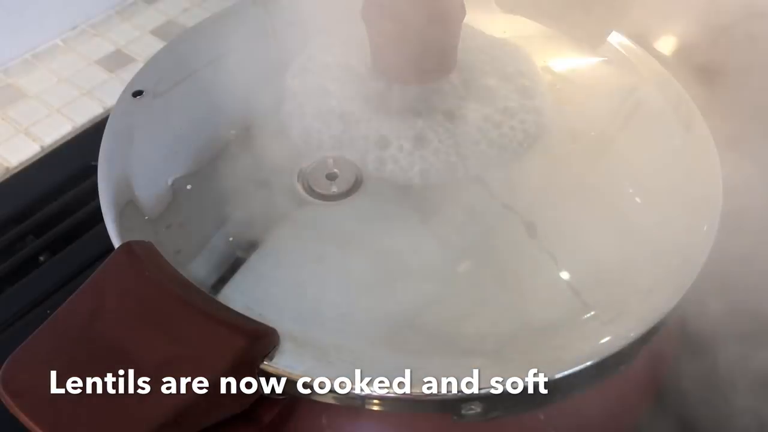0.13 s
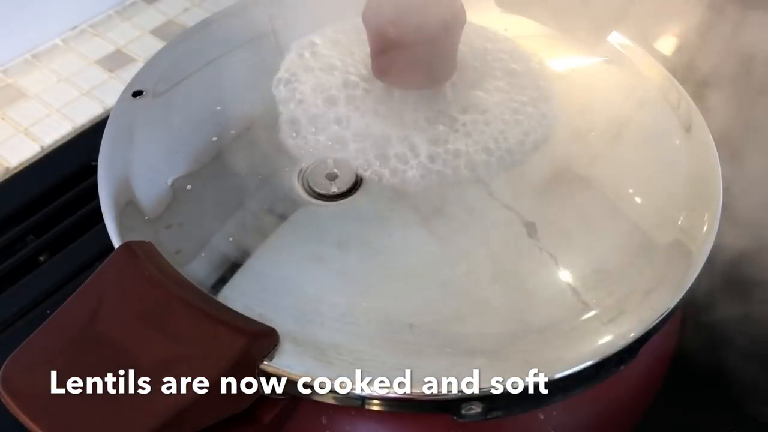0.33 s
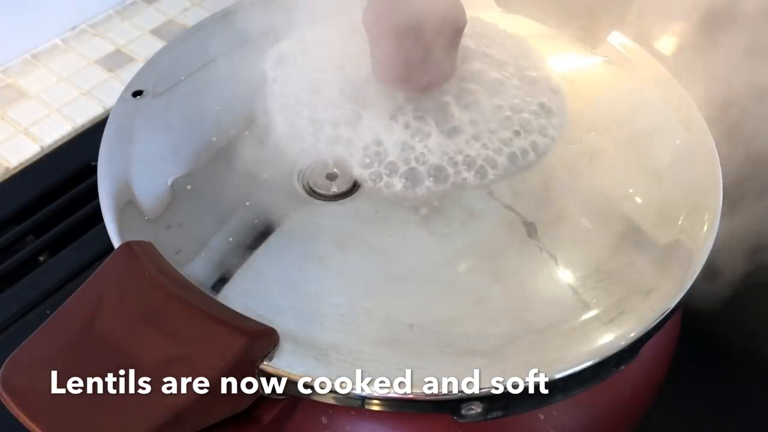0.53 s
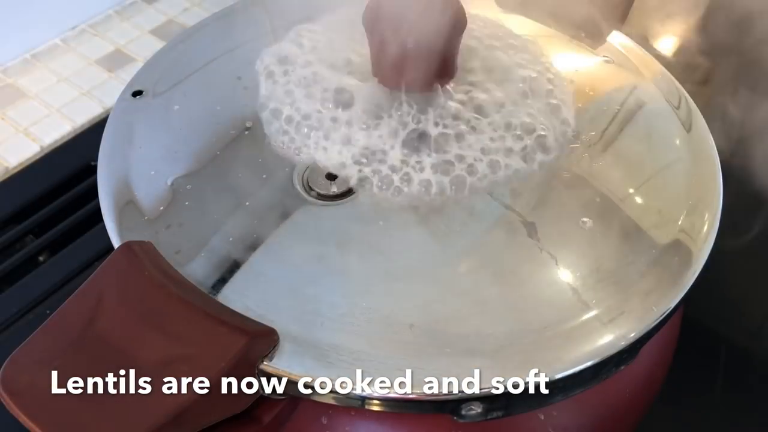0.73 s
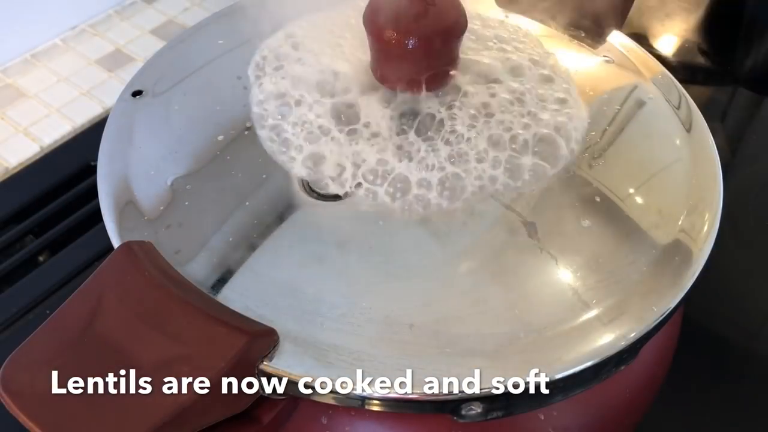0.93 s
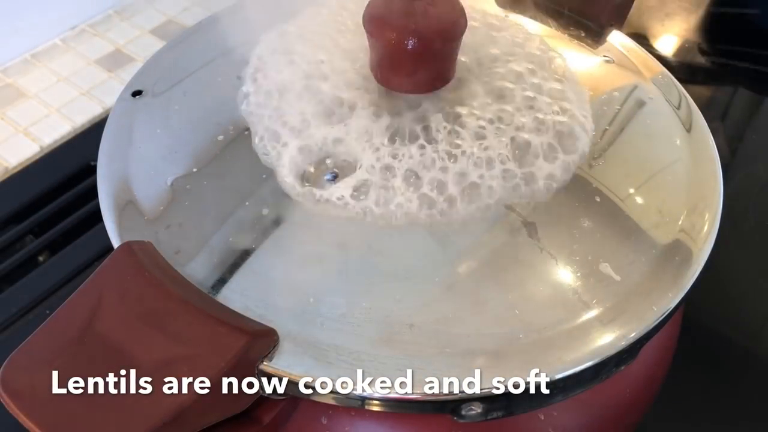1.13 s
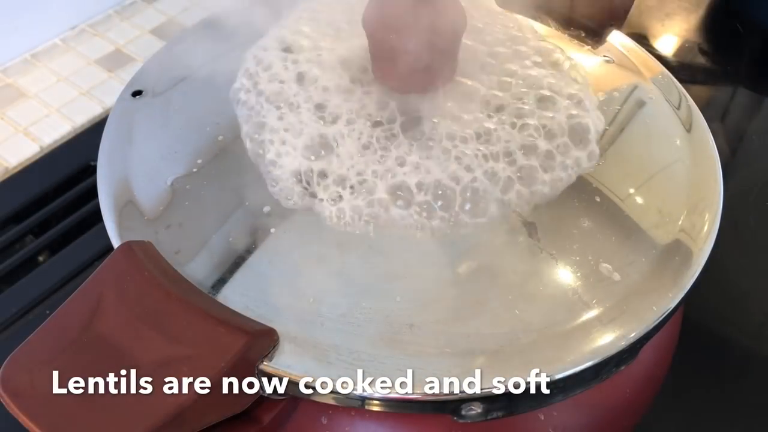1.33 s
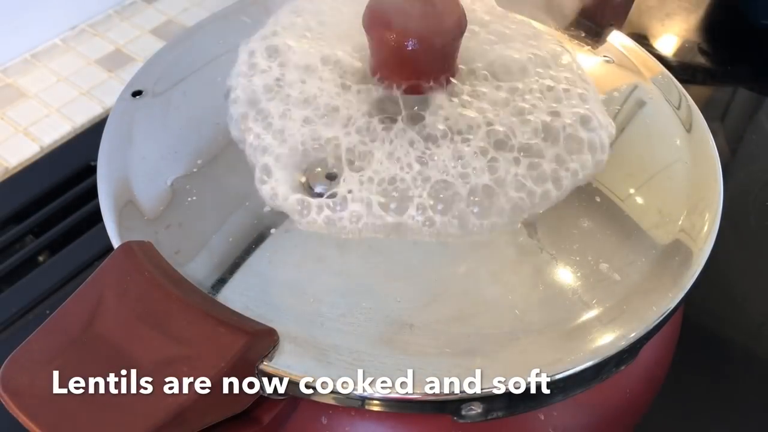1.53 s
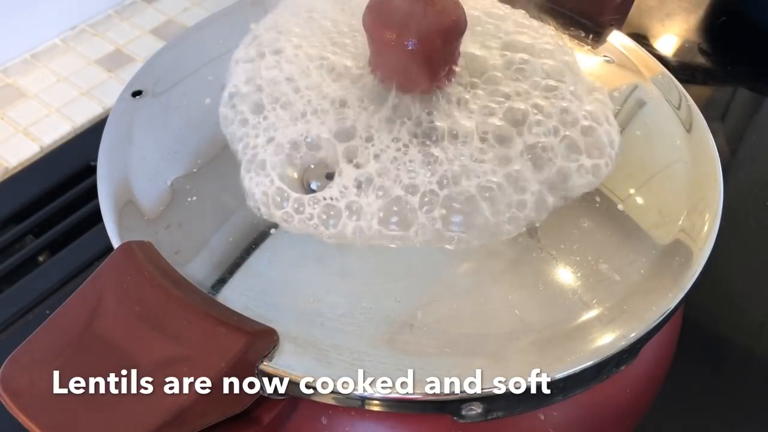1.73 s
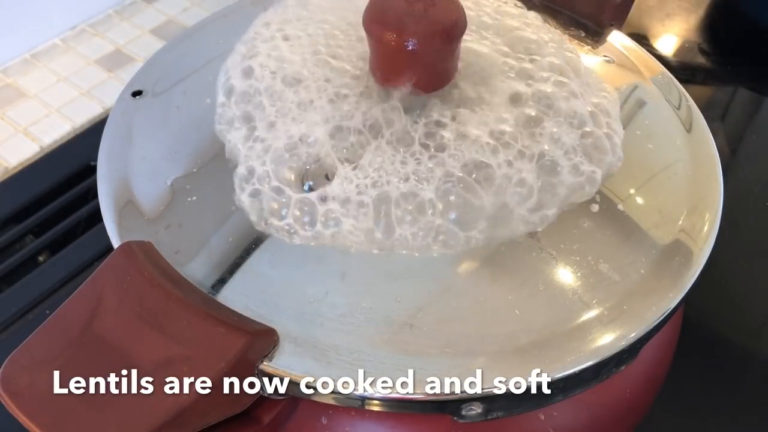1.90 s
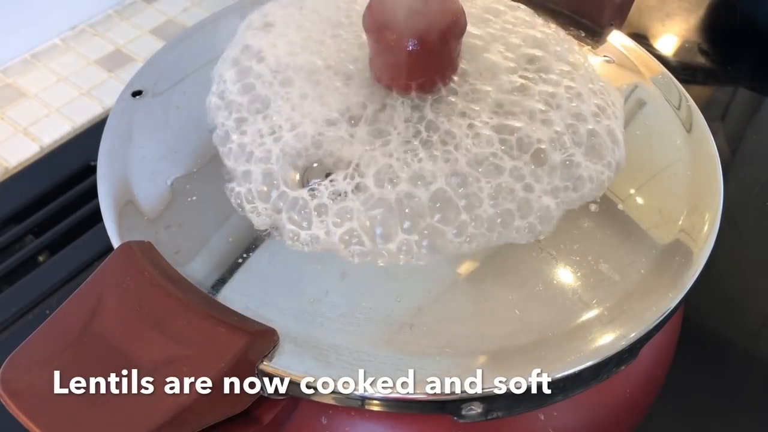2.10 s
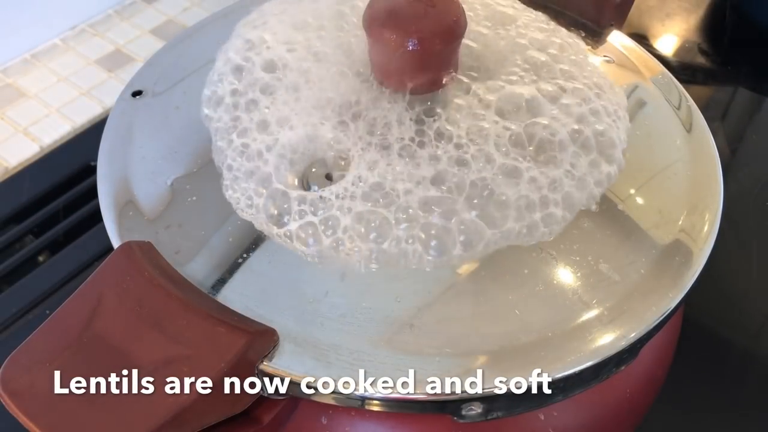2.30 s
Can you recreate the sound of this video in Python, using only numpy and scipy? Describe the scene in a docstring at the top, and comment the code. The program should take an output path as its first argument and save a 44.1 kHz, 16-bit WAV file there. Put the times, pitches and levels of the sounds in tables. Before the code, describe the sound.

Close up in a small, fairly dry kitchen, a sharp jet of steam hisses through foam on a pot lid, surging and dipping, with fizzing bubbles, crackly spurts and finally a rougher, slower sputter.

```python
"""In a small kitchen, heard close by, steam vents from under the weight of a pressure cooker valve.
A bright hiss (noise in broad humps) surges and chokes as foam wells up round the valve. Wet steam breaks
into puffs that modulate the noise: a fine flutter, then a slower sputter with dry spurts (gated noise)
and a few hard spits (decaying bursts). Bubbles fizz in grainy noise. The stove adds a faint hum,
a narrow resonance of noise, over a low rumble."""
import sys
import numpy as np
from scipy import signal
from scipy.fft import rfft, irfft, next_fast_len
from scipy.io import wavfile
from scipy.ndimage import map_coordinates

SR = 44100
rng = np.random.default_rng(int(sys.argv[2]) if len(sys.argv) > 2 else 0)


def wav_record(signal):
    """Record a signal, one row per channel, as 16-bit PCM in the file named by sys.argv[1]."""
    frames = np.transpose(np.atleast_2d(signal))
    bounded = np.clip(frames, -1, 1)
    # unit amplitude maps onto the largest positive 16-bit level
    quanta = np.round(bounded * 32767).astype(np.int16)
    wavfile.write(sys.argv[1], SR, quanta)


N = 103987
TIME = np.arange(N) / SR  # s

# Source levels hold before puffs, bursts, grain and room. Spectra are relative: noise has unit power.
# top of the hiss, around 14 kHz: (time [s], level [dB])
TOP_LEVEL = [(0.0, -36), (0.12, -28), (0.33, -39), (0.41, -29), (0.65, -30.5), (0.72, -38), (0.89, -36),
             (0.94, -38), (0.96, -30.5), (1.32, -31.5), (1.34, -37), (1.6, -34), (1.81, -39), (1.83, -54),
             (1.97, -43), (2.01, -27.5), (2.085, -41), (2.31, -36.5), (2.36, -58)]
# body of the hiss, around 8 kHz: (time [s], level [dB])
BODY_LEVEL = [(0.0, -37.5), (0.06, -36.5), (0.66, -41), (0.77, -45), (0.89, -38), (0.92, -45), (1.29, -32),
              (1.42, -44), (1.54, -35), (1.7, -41), (1.74, -48), (1.86, -54), (1.99, -40), (2.31, -47),
              (2.36, -68)]
# shoulder between the two humps, around 10.5 kHz: (time [s], level [dB])
SHOULDER_LEVEL = [(0, -49), (.13, -40), (.24, -57), (.35, -59), (.49, -42.5), (.74, -45), (.94, -50),
                  (1.02, -41.5), (1.3, -35.5), (1.4, -47.5), (1.6, -39.5), (1.86, -53.5), (2.04, -47.5),
                  (2.3, -53), (2.36, -57)]
# wet sputter: (time [s], middle level [dB], bass level [dB], upper edge level [dB])
SPUTTER_LEVEL = [(0, -39.5, -41.5, -39), (.14, -44, -45.5, -43), (.3, -40, -40.5, -40.5),
                 (.52, -48.5, -50, -46.5), (.75, -43.5, -47.5, -47.5), (.955, -39.5, -50.5, -46.5),
                 (.975, -45, -55, -52), (1.27, -46, -54, -56), (1.36, -43, -48.5, -57),
                 (1.56, -38, -46, -53), (1.71, -40, -52.5, -53), (1.78, -43.5, -52.5, -66),
                 (1.97, -39, -50, -47.5), (2.12, -43.5, -53, -65), (2.31, -42.5, -53, -51.5),
                 (2.36, -58, -65, -77)]
# fizz of the foam: (time [s], level [dB])
FIZZ_LEVEL = [(0, -46), (.45, -49.5), (1.25, -50.5), (1.55, -46.5), (1.76, -53), (1.86, -48), (1.98, -52),
              (2.12, -65)]
# stove hum: (time [s], level [dB])
HUM_LEVEL = [(.35, -59), (.8, -66.5), (1.6, -63.5)]

# steam breaking through the foam: (time [s], rate [puffs/s], depth [0-1])
PUFFS = [(0, 129, 0.12), (.7, 111, 0.38), (1.45, 97, 0.46), (1.56, 131, 0.38), (1.67, 110, 0.42),
         (1.76, 50, 0.46), (1.88, 62.5, 0.64), (2.09, 44, 0.62), (2.36, 40.7, 0.72)]
# resonances of the valve gap shift as foam fills it: (time [s], hiss centre [Hz], sputter centre [Hz])
CENTRES = [(0, 7900, 2200), (.75, 7900, 2253), (.88, 8530, 2455), (.97, 7780, 2393), (1.07, 8780, 2257),
           (1.17, 7680, 2099), (1.27, 8580, 2058), (1.38, 7700, 2100), (1.56, 8290, 2148),
           (1.67, 6984, 2379), (1.94, 7900, 2244), (2.03, 7330, 2101), (2.3, 7720, 1902)]
# hard spits: (time [s], sputter level [dB], hiss level [dB], decay [s])
SPITS = [(0.261, -36, -50, 0.0043), (0.79, -39, -48, 0.0036), (.919, -32.5, -50, 0.0028),
         (.93, -32, -44, 0.0025), (1.555, -31, -46, 0.0028), (1.983, -28.5, -34.5, 0.0068),
         (2.064, -35, -27, 0.0034), (2.157, -40, -31.5, 0.0029), (2.248, -33, -44, 0.0031),
         (2.299, -36.5, -47, 0.0063)]
# dry spurts of steam: (time [s], length [s], top level [dB], body level [dB])
SPURTS = [(0.796, 0.027, -32.5, -43), (0.864, .04, -46, -41), (0.896, .017, -30, -47),
          (.954, 0.024, -41, -38.5), (1.068, 0.021, -38, -33.5), (1.702, 0.029, -31.5, -48),
          (1.786, 0.033, -37.5, -43.5), (2.109, 0.032, -34, -46.5), (2.201, 0.034, -37, -51),
          (2.278, .018, -33, -42)]
# brief changes of the jet, mostly plugs of foam choking it: (time [s], gain [dB])
CHOKES = [(1.095, -1.5), (1.768, 0.5), (2.146, -1.5)]

# spectra of the hiss: (frequency [Hz], density [dB per Hz])
TOP_SPECTRUM = [(9500, -21.5), (11500, -5), (12400, -3.5), (13400, -2), (14700, 0.5), (15700, -3.5),
                (17000, -1)]
BODY_SPECTRUM = [(3000, -58), (5400, -14.5), (6400, -7.5), (7200, -1), (7900, -2), (8700, -1), (9700, -5),
                 (13000, -47)]
SHOULDER_SPECTRUM = [(8800, -10), (9600, -0.5), (11400, -3.5), (12800, -14)]
# spectra of the sputter: (frequency [Hz], density [dB per Hz])
MIDDLE_SPECTRUM = [(400, -43.5), (900, -14.5), (1400, -6), (1700, 0.5), (2000, 0), (2400, -1), (2750, -5),
                   (3300, -18), (6000, -20.5)]
BASS_SPECTRUM = [(100, -26), (180, -7.5), (320, -10), (400, -6.5), (550, -5.5), (760, -0.5), (1000, -0.5),
                 (1300, -2), (2000, -20.5)]
EDGE_SPECTRUM = [(1800, -53), (2600, 1), (3050, 1.5), (3450, -1), (4000, -6), (4700, -13), (7000, -32)]
# spectra of the foam and of the stove rumble: (frequency [Hz], density [dB per Hz])
FIZZ_SPECTRUM = [(3500, -15), (4500, -2.5), (6000, 0.5), (9000, -18), (16000, -5)]
RUMBLE_SPECTRUM = [(25, 2.5), (44, -1), (65, -10.5), (110, -1.5), (400, -30)]
# rings of the lid: (frequency [Hz], width [Hz], gain [dB])
LID_RINGS = [(1601, 21, -17), (1978, 44, -14), (2382, 46, -4)]

PUFF_JITTER, PUFF_JITTER_HZ, PUFF_SPREAD_DB = 0.072, 39.5, 2.15
PACE_SETTLES_S = 1.76  # from here on the pace has no jitter
PUFF_PEAK_AT, PUFF_WIDTH = 0.45, 0.21  # shares of a cycle
TOP_PUFFING, BODY_PUFFING, BASS_PUFFING = 0.22, 0.56, 1  # shares of the swing that reach each layer
SPIT_RISE_S, SPIT_BASS_DB = 0.001, -9
SPURT_EDGE_S, CHOKE_S = 0.0046, 0.0087
TOP_FLICKER_DB, BODY_FLICKER_DB, SPUTTER_FLICKER_DB, FLICKER_HZ = 2.5, 1.5, 0.5, 29.03
WHISTLE_DB, WHISTLE_WIDTH_HZ, WHISTLE_WANDER = -4, 450, 0.02  # breathy whistle of the valve gap
HISS_REST_HZ, SPUTTER_REST_HZ = 7900, 2200  # centres for which the spectra are given
SNAPS_PER_S, SNAP_HEIGHT, SNAP_S = 250, 0.82, 0.0011  # mean rate, greatest height, decay
GRAIN_DB, GRAIN_HZ = 1.03, 473  # droplets tearing the jet
FIZZ_GRAIN_DB, FIZZ_GRAIN_HZ = 3.5, 900
HUM_HZ, HUM_WIDTH_HZ, HUM_WAVER_DB, HUM_WAVER_HZ, RUMBLE_DB = 256.8, 32, 3.5, 10, -63
ECHO_DB, ECHO_SPAN_S, ROOM_DB, ROOM_T60_S = -13.5, 0.004, -11, 0.13  # energies relative to the direct sound
CUTOFF_HZ = 15750


def from_db(db):
    """Definition of the decibel: amplitude gain is ten to the power of level over twenty."""
    return 10 ** (np.asarray(db) / 20)


def rms_one(x):
    """Normalisation of power: division by the root mean square."""
    return x / np.sqrt(np.mean(x ** 2) + 1e-20)


def in_time(rows):
    """Linear interpolation: each column of a curve is read at every sample."""
    times, *columns = np.transpose(rows)
    return [np.interp(TIME, times, column) for column in columns]


def drift(hz):
    """Low-pass filtered chance: white noise through two equal poles wanders with unit power."""
    # worked out at a tenth of the sample rate; the first 2000 values let the filter settle
    pole = np.exp(-20 * np.pi * hz / SR)
    white = rng.standard_normal(N // 10 + 2002)
    slow = signal.lfilter([1], [1, -2 * pole, pole * pole], white)[2000:]
    return np.interp(np.arange(N) / 10, np.arange(len(slow)), rms_one(slow))


def resonate(x, hz, width_hz):
    """Simple resonance: a damped pole pair whose gain at the peak is about 1."""
    radius = np.exp(-np.pi * width_hz / SR)
    zeros = np.array([1, 0, -1]) * (1 - radius * radius) / 2
    poles = [1, -2 * radius * np.cos(2 * np.pi * hz / SR), radius * radius]
    return signal.lfilter(zeros, poles, x)


def noise(spectrum, flicker_db=0, count=10):
    """Spectral shaping: coloured noise of unit power whose bands fluctuate independently."""
    size = next_fast_len(N)
    hz, db = np.transpose(spectrum)
    pitch = np.log(np.maximum(np.arange(size // 2 + 1) * SR / size, 1))
    low, high = np.log(hz[0]), np.log(hz[-1])
    outside = np.maximum(low - pitch, 0) + np.maximum(pitch - high, 0)
    # beyond the given range the amplitude falls as the square of the frequency ratio
    colour = from_db(np.interp(pitch, np.log(hz), db)) * np.exp(-2 * outside)
    bins = rfft(rng.standard_normal(size)) * colour
    band = np.digitize(pitch, np.linspace(low, high, count + 1)[1:-1])
    total = 0
    for k in range(count):
        band_noise = irfft(bins * (band == k), size)[:N]
        total = total + band_noise * from_db(flicker_db * drift(FLICKER_HZ))
    return rms_one(total)


def glide(x, speed):
    """Time scaling: noise read at a changing speed has its spectrum moved up or down."""
    return map_coordinates(x, [np.cumsum(speed) % (N - 1)], order=3)


def puffing():
    """Relaxation of a blocked flow: rounded puffs, jittered at first, as the swing about unit flow."""
    rate, depth = in_time(PUFFS)
    jitter = PUFF_JITTER * drift(PUFF_JITTER_HZ) * (TIME < PACE_SETTLES_S)
    turns = np.cumsum(rate * np.exp(jitter)) / SR
    # a puff peaks just as the jitter ends
    turns = turns + (PUFF_PEAK_AT - np.interp(PACE_SETTLES_S, TIME, turns)) % 1
    puff_db = PUFF_SPREAD_DB * np.clip(rng.standard_normal(N), -2, 2)
    strength = from_db(puff_db)[turns.astype(int)]  # one draw for each puff
    shape = np.exp(-0.5 * ((turns % 1 - PUFF_PEAK_AT) / PUFF_WIDTH) ** 2)
    return np.clip(depth, 0, 1) * (rms_one(strength * shape) - 1)


def hiss(swing, spit, centre_hz):
    """Jet turbulence at the valve gap: two broad humps, a shoulder, and a whistle in the lower hump."""
    (top_db,), (body_db,), (shoulder_db,) = in_time(TOP_LEVEL), in_time(BODY_LEVEL), in_time(SHOULDER_LEVEL)
    top_spurt, body_spurt = spurts()
    top = np.hypot(from_db(top_db), top_spurt) * noise(TOP_SPECTRUM, TOP_FLICKER_DB)
    shoulder_level = np.hypot(from_db(shoulder_db), 0.5 * (body_spurt + spit))
    top += shoulder_level * noise(SHOULDER_SPECTRUM, TOP_FLICKER_DB, count=4)
    body = noise(BODY_SPECTRUM, BODY_FLICKER_DB)
    whistle = from_db(WHISTLE_DB) * resonate(body, HISS_REST_HZ, WHISTLE_WIDTH_HZ)
    wander = np.exp(WHISTLE_WANDER * drift(FLICKER_HZ))
    body = glide(rms_one(body + whistle), centre_hz / HISS_REST_HZ * wander)
    flow = np.hypot(from_db(body_db), body_spurt) * (1 + BODY_PUFFING * swing)
    return (1 + TOP_PUFFING * swing) * top + np.hypot(flow, spit) * body


def sputter(swing, spit, centre_hz):
    """Modulated noise and resonance: wet steam bursts through the foam and the lid rings with it."""
    middle_db, bass_db, edge_db = in_time(SPUTTER_LEVEL)
    flow = 1 + swing
    middle = glide(noise(MIDDLE_SPECTRUM, SPUTTER_FLICKER_DB), centre_hz / SPUTTER_REST_HZ)
    wet = np.hypot(from_db(middle_db) * flow, spit) * middle
    bass_flow = from_db(bass_db) * (1 + BASS_PUFFING * swing)
    bass_level = np.hypot(bass_flow, from_db(SPIT_BASS_DB) * spit)
    wet += bass_level * noise(BASS_SPECTRUM, SPUTTER_FLICKER_DB)
    wet += from_db(edge_db) * flow * noise(EDGE_SPECTRUM, SPUTTER_FLICKER_DB)
    wet *= crackle()
    return wet + sum(from_db(db) * resonate(wet, hz, width_hz) for hz, width_hz, db in LID_RINGS)


def crackle():
    """Shot process: foam bubbles snap at random and decay exponentially, as a gain of unit power."""
    snaps = (rng.random(N) < SNAPS_PER_S / SR) * rng.random(N)
    decaying = signal.lfilter([1], [1, -np.exp(-1 / (SNAP_S * SR))], snaps)
    return rms_one(1 + SNAP_HEIGHT * decaying)


def fizz():
    """Sum of many small bursts: foam bubbles heard as noise with a fast random grain."""
    level_db, = in_time(FIZZ_LEVEL)
    grain = from_db(FIZZ_GRAIN_DB * drift(FIZZ_GRAIN_HZ))
    return from_db(level_db) * rms_one(noise(FIZZ_SPECTRUM) * grain)


def stove():
    """Narrow-band noise: two equal resonances in series give a wavering hum, over a low rumble."""
    hum_db, = in_time(HUM_LEVEL)
    hum = rng.standard_normal(N + SR)
    for _ in range(2):
        hum = resonate(hum, HUM_HZ, HUM_WIDTH_HZ)
    waver = from_db(HUM_WAVER_DB * drift(HUM_WAVER_HZ))
    hum = rms_one(hum[SR:] * waver)  # the first second lets the resonances settle
    return from_db(hum_db) * hum + from_db(RUMBLE_DB) * noise(RUMBLE_SPECTRUM)


def kitchen(x, count=14):
    """Reflection and reverberation: quick echoes off the lid and the hob, then a short diffuse tail."""
    age = np.arange(SR // 2) / SR
    tail = rng.standard_normal(len(age)) * from_db(-60 * age / ROOM_T60_S) * (age > ECHO_SPAN_S)
    response = from_db(ROOM_DB) * tail / np.linalg.norm(tail)
    lags = (rng.uniform(0.15, 1, count) * ECHO_SPAN_S * SR).astype(int)
    response[lags] += from_db(ECHO_DB) * rng.choice([-1, 1], count) / np.sqrt(count)
    response[0] = 1  # direct sound
    return signal.fftconvolve(x, response / np.linalg.norm(response))[:N]


def spits():
    """Transient excitation: fast rise and exponential decay, as envelopes for sputter and hiss."""
    wet, bright = 0, 0
    for start_s, wet_db, bright_db, decay_s in SPITS:
        age = np.maximum(TIME - start_s, 0)
        decay = np.exp(-np.clip((age - SPIT_RISE_S) / decay_s, 0, 20))
        burst = np.minimum(age / SPIT_RISE_S, 1) * decay
        wet = wet + from_db(wet_db) * burst
        bright = bright + from_db(bright_db) * burst
    return wet, bright


def spurts():
    """Gated flow: dry spurts open and shut abruptly, as envelopes for the top and body of the hiss."""
    top, body = 0, 0
    for start_s, length_s, top_db, body_db in SPURTS:
        to_edge_s = np.minimum(TIME - start_s, start_s + length_s - TIME)
        gate = np.clip(to_edge_s / SPURT_EDGE_S, 0, 1)
        top = top + from_db(top_db) * gate
        body = body + from_db(body_db) * gate
    return top, body


def choking():
    """Flow obstruction: the jet dips briefly as plugs of foam choke it, with one slight lift between."""
    return from_db(sum(db * np.exp(-((TIME - s) / CHOKE_S) ** 2) for s, db in CHOKES))


def scene():
    """Superposition: valve and foam sound in the kitchen, and the stove is added below."""
    swing = puffing()
    wet_spit, bright_spit = spits()
    hiss_hz, sputter_hz = in_time(CENTRES)
    grain = rms_one(from_db(GRAIN_DB * drift(GRAIN_HZ)))
    steam = hiss(swing, bright_spit, hiss_hz) + sputter(swing, wet_spit, sputter_hz)
    valve = grain * choking() * steam
    return (kitchen(valve + fizz()) + stove())[None]


def record(dry):
    """Band limitation: a steep elliptic low-pass removes the top of the spectrum."""
    lowpass = signal.ellip(14, 0.1, 80, CUTOFF_HZ, fs=SR, output="sos")  # ripple and stop depth in dB
    return signal.sosfilt(lowpass, dry)


dry = scene()
out = record(dry)
wav_record(out)
```